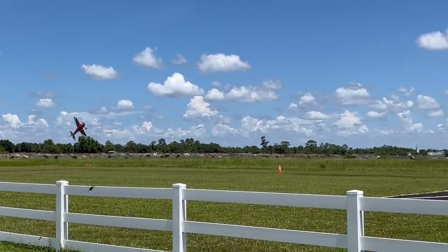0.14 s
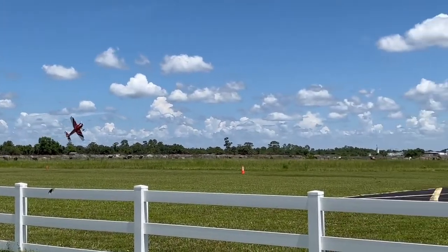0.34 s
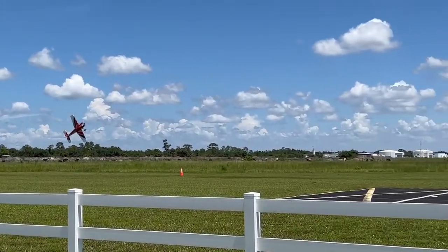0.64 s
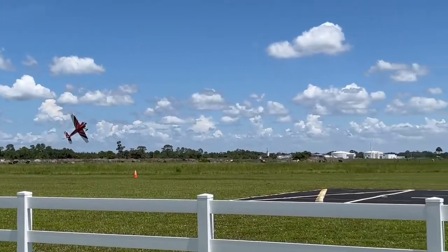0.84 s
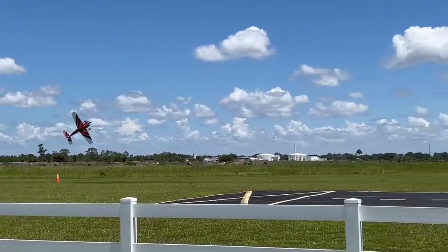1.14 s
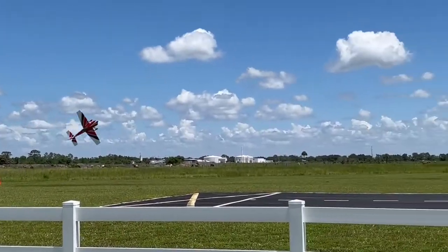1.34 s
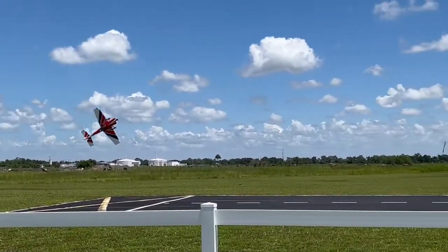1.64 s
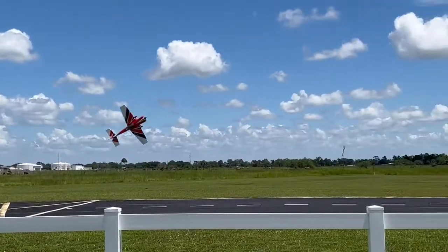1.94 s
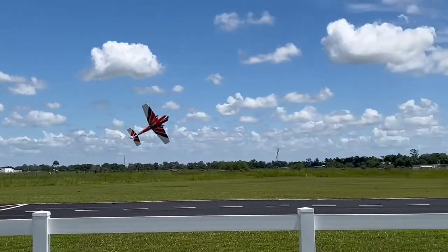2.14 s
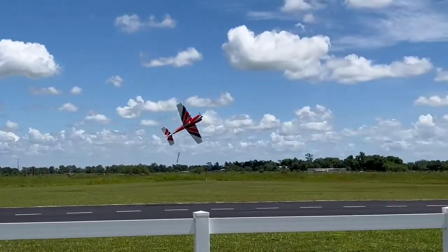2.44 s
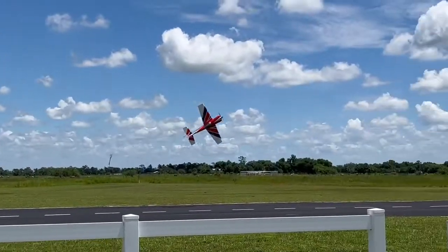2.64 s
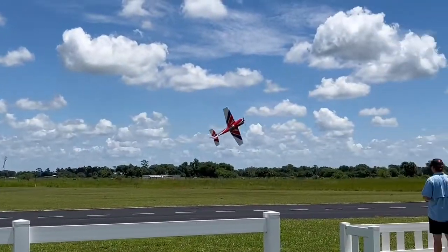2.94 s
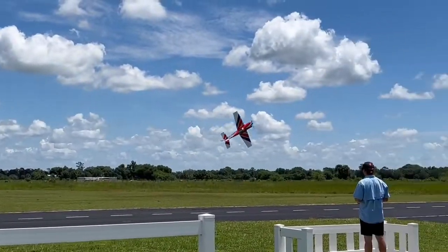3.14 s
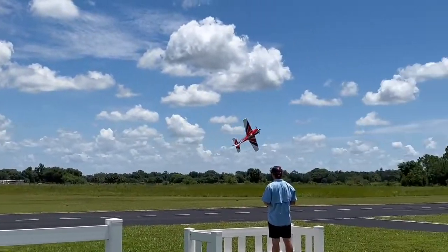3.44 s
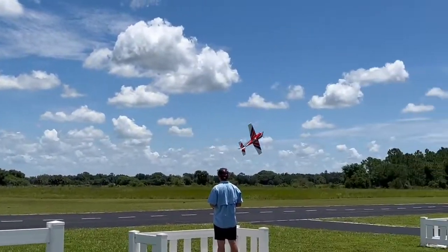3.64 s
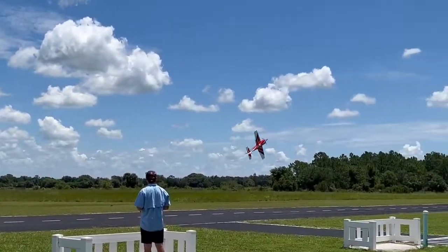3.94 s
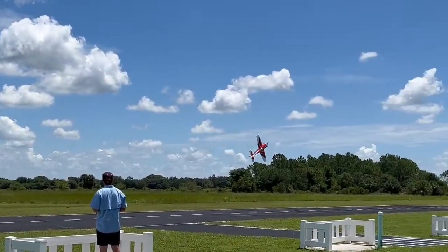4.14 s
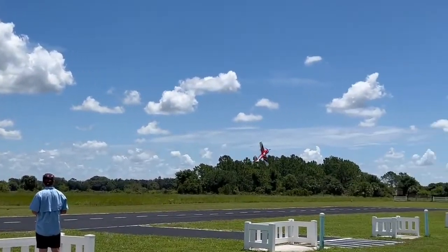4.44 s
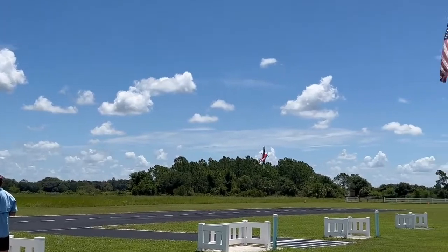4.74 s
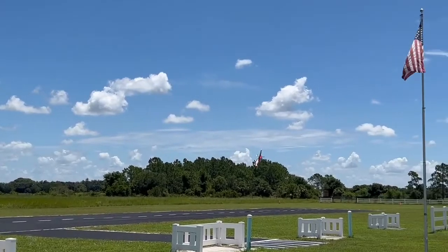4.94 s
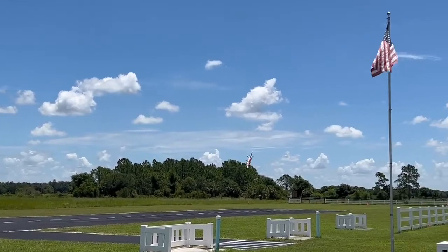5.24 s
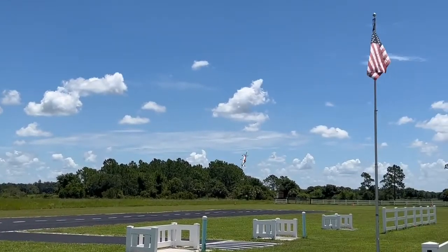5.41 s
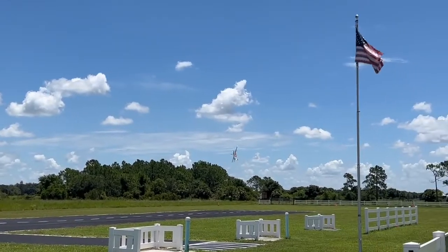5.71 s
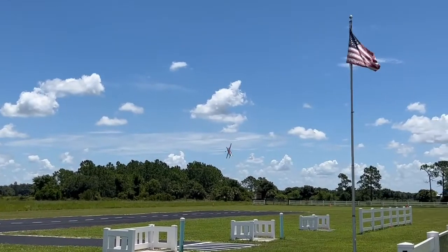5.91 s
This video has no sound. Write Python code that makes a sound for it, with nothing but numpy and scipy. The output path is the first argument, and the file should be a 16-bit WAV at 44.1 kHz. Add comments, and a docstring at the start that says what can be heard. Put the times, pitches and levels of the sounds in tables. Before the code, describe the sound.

An outdoor stereo microphone, close to the wind, follows an electric aerobatic model plane over a grass field. From 0 s a thin, shrill motor whine around 5 kHz, roughened by closely spaced side tones, sits above gusty low rumble and dull buffets. Quick falling swishes flick by near 0.4 s and a softer one near 1 s. From 1 to 3 s the whine slides smoothly down by over a semitone, with a low propeller hum near 250 Hz and pulsing, airy hiss. Around 3 to 3.8 s the whine swells amid bright hiss and hard wind thumps. It sags lowest near 4.6 s, with a slight throb around 4.2 s, then rises a little and drops sharply in level near 4.8 s. To 6 s the distant whine thins, the rumble dies down, and light flutter, raspy wind and a few small bumps remain.

```python
"""Over a grass field an electric aerobatic model plane flies past, low on knife edge, and draws away.
Its motor whines on the 60th shaft order with sidebands a shaft turn apart, and brief swishes slide down.
The three-blade propeller is a sum of low tones and pulsing noise, part of it combed by a ground echo.
Gusts of shaped noise and short buffets strike the microphone over the steady murmur of the field."""
import sys
import numpy as np
from scipy.fft import rfft, irfft, next_fast_len
from scipy.io import wavfile
from scipy.ndimage import map_coordinates

SR = 44100
rng = np.random.default_rng(int(sys.argv[2]) if len(sys.argv) > 2 else 0)


def master_out(mix):
    """Clip the mix to full scale and print it as 16-bit PCM to the path in sys.argv[1]."""
    frames = np.transpose(np.atleast_2d(mix))
    ceiling = np.clip(frames, -1, 1)
    pcm = np.round(ceiling * 32767).astype(np.int16)
    wavfile.write(sys.argv[1], SR, pcm)


N = 267598
TIME_S = np.arange(N) / SR


def amp(db):
    """Level law: decibels to amplitude gain."""
    return 10 ** (np.asarray(db) / 20)


def unit(x):
    """Normalization: scale to rms 1."""
    return x / np.sqrt(np.mean(x ** 2) + 1e-20)


def along(points, hz):
    """Interpolation of (f/Hz, value) points on a logarithmic frequency axis."""
    f, v = np.transpose(points)
    return np.interp(np.log(hz + 1), np.log(f + 1), v)


def curves(rows):
    """Linear interpolation in time: one curve for each column after t/s."""
    s, *columns = np.transpose(rows)
    return [np.interp(TIME_S, s, column) for column in columns]


def swing(rows):
    """Level variation: a curve in dB about its own mean."""
    db, = curves(rows)
    return db - db.mean()


def lobe(centre_s, reach_s):
    """Gaussian window: 1 at its centre time, 1/e at its half-width, 0 far away."""
    return np.exp(-((TIME_S - centre_s) / reach_s) ** 2)


def wobble(rate):
    """Band-limited random process: a smooth curve through `rate` random knots a second."""
    knots = rng.standard_normal(int(N * rate / SR) + 4)
    coarse = np.arange(0, N, 16)
    smooth = map_coordinates(knots, [coarse * rate / SR])
    return np.interp(np.arange(N), coarse, smooth)


def turbulence(rate):
    """Random process: the strength of passing eddies wanders, with a far-off safety limit."""
    limit = 9.2  # standard deviations
    return limit * np.tanh(wobble(rate) / limit)


def filtered(x, response):
    """Linear filtering: the spectrum of x times a complex response of frequency."""
    m = next_fast_len(N + SR // 2)
    return irfft(rfft(x, m) * response(np.fft.rfftfreq(m, 1 / SR)), m)[..., :N]


def rush(spectrum, alike):
    """Partially correlated noise: coloured stereo of rms 1, mixed from a mid and a side."""
    def mid_side_gains(hz):
        turn = np.arccos(np.clip(along(alike, hz), -1, 1)) / 2
        return amp(along(spectrum, hz)) * np.array([np.cos(turn), np.sin(turn)])

    mid, side = filtered(rng.standard_normal((2, N)), mid_side_gains)
    return unit(np.array([mid + side, mid - side]))


def partial(angle, multiple, fade_db, fade_rate, blur, scatter):
    """Turbulent scattering: the tone of one shaft order fades and its phase is smeared."""
    phase = multiple * angle + scatter * rng.standard_normal() + blur * wobble(45)
    fade = unit(amp(fade_db * wobble(fade_rate)))
    return np.sqrt(2) * fade * np.sin(phase)


def shimmer():
    """Log-normal scintillation: the gain of one tone after its way through turbulent air."""
    spread = np.log(amp(1.4))
    return np.exp(spread * turbulence(17) - spread ** 2)


def astern():
    """Changing aspect: 0 while the plane passes, 1 once it is far off and shows its tail."""
    centre_s, turn_s = 4.9, .2
    return .5 + .5 * np.tanh((TIME_S - centre_s) / turn_s)


# shaft rate as heard, throttle and Doppler shift together: t/s, rate/(turns per s)
SHAFT_RATE = [(0, 87.05), (.1, 87.1), (.28, 86.25), (.6, 85.94), (.81, 86.35), (.92, 85.75), (1.22, 85.45),
              (2, 82.98), (2.8, 80.33), (3.3, 79.1), (3.8, 78.33), (4.2, 78.2), (4.66, 77.7), (4.85, 80.1),
              (5.08, 81.7), (5.3, 81.8), (5.6, 81.45), (5.86, 81.65), (6.07, 83.3)]


def shaft():
    """Phase integration: the angle in radians is the running sum of the shaft rate as heard."""
    speed, = curves(SHAFT_RATE)
    return speed, 2 * np.pi * np.cumsum(speed) / SR


COG_ORDER = 60
COG_DB = -10  # between the lobes, against the whine
THROB_S, THROB_WIDTH_S, THROB_DEPTH = 4.15, .4, .22


def throb(angle):
    """Amplitude modulation: for a while the cogging tone throbs once a turn."""
    return 1 + THROB_DEPTH * lobe(THROB_S, THROB_WIDTH_S) * np.cos(angle)


# lobes of the cogging tone: t/s, half-width/s, level over that between lobes/dB
COG_LOBES = [(.21, 0.2, 9.5), (.76, 0.36, 8.5), (1.27, 0.052, 3.5), (1.65, .15, -3), (1.97, 0.18, 3),
             (2.45, .25, -2.5), (3.0, .12, 4), (3.33, 0.27, 10.5), (3.76, .04, -5), (3.9, 0.27, 6),
             (4.95, .12, 1.5), (5.42, 0.42, 6.5), (5.93, .05, 8)]


def cogging(angle):
    """Magnetic cogging and directivity: magnets pass the stator; beamed lobes sweep the listener."""
    level_db = COG_DB + sum(db * lobe(s, reach) for s, reach, db in COG_LOBES)
    tone = partial(angle, COG_ORDER, fade_db=1, fade_rate=30, blur=.1, scatter=0)
    return amp(level_db) * throb(angle) * shimmer() * tone


# lobes and nulls of single sidebands: shaft order, t/s, half-width/s, level change/dB
SIDEBAND_LOBES = [(54, 1.15, 1.07, 9), (55, 2.6, .45, 9), (56, .88, 1.4, 9), (57, .58, 1.03, 10),
                  (57, .57, .17, -7), (57, 5.5, .3, 1), (62, .66, .17, 4), (63, .68, .16, 5),
                  (64, .6, .2, 4), (66, .52, .1, 5), (57, 3.3, .5, -4), (57, 4.6, .25, -4),
                  (58, 3.4, .35, -3), (62, 5.6, .7, -5), (66, 4.85, .25, -9), (66, 5.25, .2, 5),
                  (69, 4.82, .08, 5), (58, 1.01, .73, 6), (58, 5.62, .79, -7), (59, 2.46, .23, -10),
                  (59, .53, .46, -8), (59, 1.85, .3, 3), (61, 3.01, .16, -14), (61, 1.65, .12, 6),
                  (62, 3.8, .5, 2), (63, 2.42, .55, 11), (63, 3.81, 1.4, -7), (63, 6.05, .1, 7),
                  (64, 5.49, .67, -14), (64, 2.43, .71, 5), (65, 2.66, .97, 17), (65, .43, .44, 12),
                  (66, 2.95, .25, 5), (66, 3.74, .34, -14), (66, .79, .21, -10), (66, 5.45, .4, -3),
                  (67, 2.89, .43, 13), (67, .58, 1.4, 7), (68, 2.96, .3, 10), (69, 1.7, .56, 9),
                  (69, 2.68, .21, -13), (69, 5.4, .6, -6), (70, 3.29, .18, 10), (71, 3.54, .35, 11),
                  (71, 2.57, .29, 14), (72, 3.4, .33, 8), (72, 4.3, .5, -10), (73, 2.61, .28, 11),
                  (74, 2.82, .4, 16), (75, 2.8, .6, 15), (75, 3.19, .21, -7), (77, 2.34, .22, 13),
                  (77, 3.15, .12, 15), (78, 3.09, .22, 16), (81, 2.7, .3, 14)]


def sideband_lobe(multiple):
    """Directivity: dB that the lobes and nulls of one sideband add as they sweep by."""
    return sum(db * lobe(s, reach) for order, s, reach, db in SIDEBAND_LOBES if order == multiple)


# sidebands between their lobes: shaft order, level against the whine/dB
SIDEBANDS = [(54, -26), (55, -28), (56, -25), (57, -17), (58, -16.5), (59, -16), (61, -18), (62, -14.5),
             (63, -14), (64, -17), (65, -22.5), (66, -16), (67, -27), (68, -22), (69, -19), (70, -27),
             (71, -27), (72, -22.5), (73, -28), (74, -28), (75, -27.5), (77, -29), (78, -29), (81, -30)]


def sidebands(angle):
    """Modulation by an uneven rotor: tones a shaft turn apart, which flutter when they fall in step."""
    in_step, astern_db = .88, 5
    looseness = 1 - in_step * lobe(THROB_S, THROB_WIDTH_S)
    tones = np.zeros(N)
    for multiple, db in SIDEBANDS:
        # from behind, the sidebands at multiples of the blade rate stand out
        level_db = db + sideband_lobe(multiple) + astern_db * astern() * (multiple % 3 == 0)
        drift = looseness * (rng.uniform(-np.pi, np.pi) + .6 * wobble(5)) / multiple
        scatter = .12 * abs(multiple - COG_ORDER)
        tone = partial(angle + drift, multiple, fade_db=2.5, fade_rate=14, blur=.15, scatter=scatter)
        tones += amp(level_db) * shimmer() * tone
    return tones


# relative noise spectrum of the motor vents: f/Hz, level per Hz/dB
VENTS = [(3800, -35), (4550, -12), (4900, 16), (5300, 0), (5700, -15), (6300, -21), (7000, -3), (9000, -39)]
# stereo likeness of the vents and propeller air: f/Hz, left-right correlation
AIR_ALIKE = [(500, 1), (1300, 0.45), (2500, 1), (5000, 1), (12000, 1)]


def vents(angle, speed):
    """Rotor-modulated flow noise: air whistles through the motor, pitched by the shaft, pulsing each turn."""
    place = np.cumsum(speed / speed.mean()) - 1  # resampling makes the pitch follow the shaft
    whistle = np.array([map_coordinates(side, [place]) for side in rush(VENTS, AIR_ALIKE)])
    gain = amp(-17.5)  # against the whine
    return gain * (1 + .5 * np.cos(angle)) * whistle


# reference level of the motor's whine, whose swings also drive the wash: t/s, level/dB
WHINE = [(0.0, -48), (0.08, -43), (0.3, -45), (0.39, -47.5), (0.46, -46), (0.52, -49), (0.6, -46),
         (0.75, -46), (.97, -40.5), (1.06, -47), (1.1, -42.5), (1.71, -44.5), (1.92, -43.5), (2.53, -46),
         (3.33, -46), (4.29, -45), (4.44, -50.5), (4.63, -44), (4.83, -54.5), (5.64, -57), (5.71, -62),
         (6.07, -58)]


def motor(angle, speed):
    """Superposition of shaft orders: cogging, sidebands and vents share one slightly unsteady angle."""
    whine_db, = curves(WHINE)
    whine_db = whine_db - 13 * lobe(.413, .028)  # it drops out before it swishes back in
    angle = angle + .006 * wobble(30)  # radians
    sources = cogging(angle) + sidebands(angle) + vents(angle, speed)
    return amp(whine_db + .8 * wobble(35)) * sources


# blade-passing harmonics: shaft order, level/dB, loudest t/s, lobe half-width/s
BLADES = [(3, -42, 1.45, .3), (3, -43, 2.0, .15), (6, -56.5, 2.4, .8), (9, -63, 2.7, 1.4),
          (12, -60, 2.2, .35), (12, -60, 3.8, 1), (15, -72, 4.9, 1.2), (18, -70, 1.5, 1.2),
          (21, -65.5, 2.1, .8), (24, -70, 3, 1.5)]
# bearing tones between the whole orders: shaft order, level/dB, loudest t/s, lobe half-width/s
BEARINGS = [(9.47, -52.5, 3.25, .38), (9.47, -61.5, 1.75, .5), (9.47, -62, 4.65, .15),
            (11.47, -60.5, 2.1, 1.3), (12.6, -64, 2.1, .3), (15.8, -66, 4.55, .45), (24.7, -68, 4.25, .25),
            (25.3, -65.5, 3.8, .7), (25.3, -69, 1.5, .35), (31.6, -64, 1.1, .45), (31.6, -66, 2.65, .55),
            (31.6, -66, 4.6, .15), (32.6, -70, 2.5, .6), (33.6, -69, 2.4, .6), (34.7, -71, 2.4, .5)]


def hum(angle):
    """Tonal directivity: each low tone has its own lobes, whose powers add as the plane passes."""
    power = {}
    for multiple, db, centre, reach in BLADES + BEARINGS:
        gain = amp(db) / (1 + ((TIME_S - centre) / reach) ** 2)
        power[multiple] = power.get(multiple, 0) + gain ** 2
    return sum(np.sqrt(p) * partial(angle, multiple, fade_db=2.6, fade_rate=14, blur=.24, scatter=3)
               for multiple, p in power.items())


def ground_lag():
    """Image source: the echo's delay in seconds is inversely proportional to the plane's distance."""
    nearest_s, nearest_m, speed_m_per_s, longest_lag_s = 2.85, 20, 12.7, .00118
    distance_m = np.hypot(nearest_m, speed_m_per_s * (TIME_S - nearest_s))
    return longest_lag_s * nearest_m / distance_m


def over_ground(air):
    """Comb filtering: noise interferes with its own ground echo, then is scaled to rms 1."""
    earlier = np.arange(N) - ground_lag() * SR
    echo = np.array([map_coordinates(side, [earlier]) for side in air])
    return unit(air + .3 * echo)


# relative spectrum of the propeller wash: f/Hz, level per Hz/dB
WASH = [(300, -10), (600, 15), (1000, 6.5), (1400, 6.5), (2000, -0.5), (2800, -2), (3600, -6.5), (4500, -4),
        (7000, -3.5), (10000, -42)]


def wash():
    """Broadband turbulence with ground interference: its level follows the whine in part."""
    level_db = -52 + .58 * swing(WHINE)
    return amp(level_db) * over_ground(rush(WASH, AIR_ALIKE))


# relative spectrum of the blade hiss: f/Hz, level per Hz/dB
HISS = [(2200, -14), (3500, -1), (4300, 2.5), (5000, 7.5), (6100, 4.5), (7000, 1), (8000, 2), (9500, 1),
        (11000, -8), (13000, -40)]


def hiss(treble_db):
    """Broadband blade noise with ground interference: its level follows the treble in part."""
    return amp(-54.5 + .66 * treble_db) * over_ground(rush(HISS, AIR_ALIKE))


# relative spectrum of the topmost blade noise: f/Hz, level per Hz/dB
SIZZLE = [(8000, -41), (9500, -9), (10500, 0.5), (12000, 7), (13000, -2), (14500, -0.5), (15700, -5.5)]


def sizzle(treble_db):
    """Fine-scale turbulence noise: the topmost band follows the treble, with a quick flicker of its own."""
    return amp(-57.5 + .91 * treble_db + wobble(25.25)) * rush(SIZZLE, AIR_ALIKE)


# relative spectrum of the slipstream: f/Hz, level per Hz/dB
SLIPSTREAM = [(1600, -25), (2000, 1), (2400, 0), (2900, -19), (3600, 2), (4200, -5), (5000, -25)]


def slipstream():
    """Jet turbulence: the slipstream's noise swells and fades late, as the plane draws away."""
    return amp(-60) * lobe(4.5, .55) * rush(SLIPSTREAM, AIR_ALIKE)


# level of the treble hiss, swelling and dipping, used about its mean: t/s, level/dB
TREBLE = [(0.0, -57.5), (0.1, -51), (0.41, -58), (1.23, -51), (1.43, -58), (1.47, -51.5), (2.01, -61.5),
          (2.75, -50.5), (2.85, -52.5), (2.94, -44.5), (2.97, -54), (3.21, -51.5), (3.9, -57.5),
          (3.97, -51.5), (4.16, -57.5), (4.22, -49.5), (4.38, -64), (4.68, -53.5), (4.71, -60), (4.99, -66),
          (5.14, -54), (5.34, -72), (5.73, -61.5), (6.07, -62)]


def propeller_air(angle):
    """Periodic modulation: blade noise pulses with each blade and each turn, and the treble flickers."""
    treble_db = swing(TREBLE) + 1.5 * wobble(14)
    treble = amp(1.1 * wobble(28)) * (hiss(treble_db) + sizzle(treble_db))
    blade_beat = 1 + .12 * (np.cos(3 * angle) + .7 * np.cos(angle))
    return blade_beat * (wash() + slipstream() + treble)


# breeze between the gusts, whose rumble dies down while flutter and rasp pick up again late:
# t/s, rumble level/dB, flutter level/dB, rasp level/dB
BREEZE = [(0, -34, -38, -45.5), (2.8, -40, -47, -57.5), (5.3, -48.5, -46, -52.5), (6.07, -56, -44.5, -48)]
# gusts: start t/s, length/s, rumble level/dB, flutter level/dB, rasp level/dB
GUSTS = [(0.01, 0.039, -39, -28.5, -60), (0.19, 0.06, -38, -36.5, -47.5), (0.418, 0.063, -29, -33.5, -51),
         (0.569, 0.13, -33, -29.5, -58), (0.756, 0.025, -26.5, -32, -43),
         (1.006, 0.14, -34.5, -35.5, -43.5), (1.195, 0.16, -36.5, -38, -44.5),
         (1.552, 0.072, -32.5, -38.5, -48.5), (1.717, 0.12, -31.5, -33, -52),
         (1.886, 0.091, -32, -43, -47.5), (2.23, 0.14, -36.5, -42, -50), (2.49, 0.18, -35, -40, -58),
         (2.992, 0.032, -31, -29, -49), (3.025, 0.059, -30, -38, -43), (3.149, 0.15, -29, -34.5, -46.5),
         (3.324, 0.21, -33, -33.5, -44), (3.528, 0.14, -36.5, -37.5, -46),
         (3.699, 0.051, -36.5, -34, -42.5), (3.909, 0.12, -36.5, -38, -47),
         (4.121, 0.069, -33.5, -37.5, -49), (4.346, 0.091, -33.5, -41.5, -47),
         (4.51, 0.082, -33, -38.5, -45.5), (4.656, 0.17, -35, -41.5, -47.5), (5.034, 0.11, -59, -46, -45.5)]


def gusting():
    """Addition of powers: each gust rises, holds and decays exponentially over the breeze."""
    attack_s, release_s = .015, .057
    power = amp(curves(BREEZE)) ** 2
    for start, length, *levels_db in GUSTS:
        rise = np.clip((TIME_S - start) / attack_s + .5, 0, 1)
        fall = np.exp(-np.maximum(TIME_S - start - length, 0) / release_s)
        power += np.outer(amp(levels_db), rise * fall) ** 2
    return np.sqrt(power)


# relative spectra of the wind's low, middle and upper parts: f/Hz, level per Hz/dB
RUMBLE = [(15, -36), (25, -29), (40, -7.5), (55, 2), (80, 2), (120, -0.5), (170, -6.5), (250, -17.5),
          (450, -33), (900, -75)]
FLUTTER = [(70, -6), (130, -9), (190, -1.5), (270, -0.5), (380, -6), (500, -14.5), (700, -24.5),
           (1400, -91)]
RASP = [(250, -13.5), (400, 3), (500, 0.5), (680, -3.5), (900, -13), (1150, -17), (2000, -45), (4000, -70)]
# stereo likeness of the wind: f/Hz, left-right correlation
WIND_ALIKE = [(60, 0.78), (200, 0.87), (700, 0.39)]


def wind():
    """Turbulent pressure on the microphone: low rumble, lumpy flutter, and rasp from the smallest eddies."""
    rumble_gain, flutter_gain, rasp_gain = gusting()
    eddies, lumps = turbulence(40), turbulence(110)
    rumble = unit(amp(1.64 * eddies) * rush(RUMBLE, WIND_ALIKE))
    flutter = unit(amp(1.4 * eddies + 3.8 * lumps) * rush(FLUTTER, WIND_ALIKE))
    rasp = unit(amp(2.2 * eddies + 2.8 * lumps) * rush(RASP, WIND_ALIKE))
    return rumble_gain * rumble + flutter_gain * flutter + rasp_gain * rasp


# relative spectrum of the open field: f/Hz, level per Hz/dB
FIELD = [(25, -21), (60, 12), (150, -16), (300, -4), (600, -23), (1000, -14.5), (1600, -22), (2500, -19.5),
         (4000, -26), (7000, -61), (9000, -28), (12000, -72), (16000, -53)]
# stereo likeness of the field: f/Hz, left-right correlation
FIELD_ALIKE = [(60, 0.84), (400, 0.17), (1200, 0.055), (2500, 0.92), (6000, 0.5)]


def field():
    """Stationary noise: the steady murmur of the open field."""
    return amp(-48) * rush(FIELD, FIELD_ALIKE)


# hardest buffets: t/s, nominal edge level/dB, nominal thump level over edge/dB, thump f/Hz
BUFFETS = [(0.156, -37.5, 21, 255), (0.217, -35, 18.5, 110), (.263, -29.5, -8, 250),
           (.364, -29.5, -11, 250), (0.448, -32, 15.5, 204), (0.586, -34.5, 25, 111),
           (.648, -37.5, 19.5, 265), (0.683, -22.5, 9.5, 155), (1.015, -30, 11.5, 107),
           (1.086, -41, 23, 80), (1.248, -29.5, 13.5, 106), (1.729, -40, 21, 173), (1.796, -29, 10, 227),
           (1.848, -37, 19, 114), (3.035, -33.5, 15, 129), (3.075, -34.5, 16, 83), (3.172, -30, 13.5, 150),
           (3.218, -33, 14, 99), (3.372, -27, 12, 80), (3.43, -23, 8, 403), (3.52, -21.5, -3, 200),
           (3.683, -19, 4, 165), (3.739, -21, -6, 112), (4.424, -30, 8.5, 210), (4.602, -40.5, 24.5, 85),
           (4.816, -42, 9, 200), (4.985, -48, 23, 65), (5.038, -32, -7, 82), (5.149, -36, 9, 240),
           (5.941, -31.5, -1, 262), (6.007, -31.5, 2, 83)]


def buffets():
    """Pressure transients: a single strong eddy gives a sharp edge and a short thump."""
    cycles, lead_s, edge_hz, edge_cycles = .72, .00194, 640, .88
    thumps = np.zeros((2, N))
    for s, db, thump_db, hz in BUFFETS:
        near = abs(TIME_S - s) < .05
        u = TIME_S[near] - s - lead_s
        # one random phase, and a small offset for each side
        phase = rng.uniform(0, 2 * np.pi) + rng.normal(0, .45, (2, 1))
        edge = np.exp(-(u * edge_hz / edge_cycles) ** 2) * np.sin(2 * np.pi * u * edge_hz + phase)
        thump = np.exp(-((u * hz - .3) / cycles) ** 2) * np.sin(2 * np.pi * u * hz + phase)
        # the edge plays 2 dB and the thump 4 dB under its nominal level
        thumps[:, near] += amp(db - 2) * edge + amp(db + thump_db - 4) * thump
    return thumps


# brief falling swishes: t/s, half-width/s, centre f/Hz, slide/(Hz per s), level/dB
SWISHES = [(.412, .014, 7100, -15000, -57), (.457, .03, 5800, -11000, -49.5),
           (.96, .055, 5950, -2000, -52.5), (3.97, .045, 5450, -1000, -53)]


def swish():
    """Narrow-band noise on a gliding carrier: brief bands slide down in frequency."""
    knots_per_s = 900  # sets the bandwidth
    out = np.zeros(N)
    for s, reach, hz, slide, db in SWISHES:
        u = TIME_S - s
        phase = 2 * np.pi * (hz + slide * u / 2) * u
        band = wobble(knots_per_s) * np.cos(phase) + wobble(knots_per_s) * np.sin(phase)
        out += amp(db) * lobe(s, reach) * unit(band)
    return out


def scene():
    """Linear superposition of the plane, the wind and the open field."""
    speed, angle = shaft()
    plane = motor(angle, speed) + hum(angle) + propeller_air(angle) + swish()
    return plane + wind() + field() + buffets()


# phase between the microphone's two ports, largest in the top octave: f/Hz, left lead/half cycles
PORTS = [(600, -.07), (1400, .16), (2500, .06), (3200, .13), (5000, .14), (6200, .03), (8600, -.03),
         (9100, -.46), (10100, -1), (12000, -2), (13850, -3), (15400, -4)]


def record(dry):
    """Microphone response: a bass roll-off, a phase difference between the ports and an upper band limit."""
    low_cut_hz, top_hz = 32, 15800

    def response(hz):
        lead = np.pi * along(PORTS, hz) * np.array([[1], [-1]]) / 2  # half to each side
        low_cut = hz ** 4 / np.hypot(hz ** 4, low_cut_hz ** 4)
        return np.exp(1j * lead) * low_cut * (hz < top_hz)

    return filtered(dry, response)


dry = scene()
out = record(dry)
master_out(out)
```